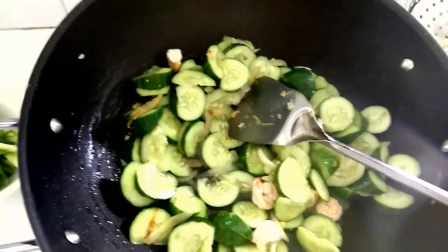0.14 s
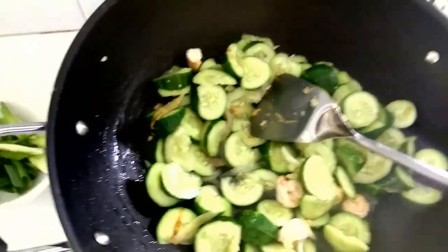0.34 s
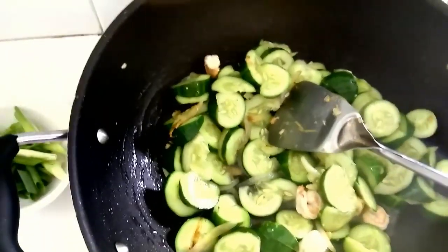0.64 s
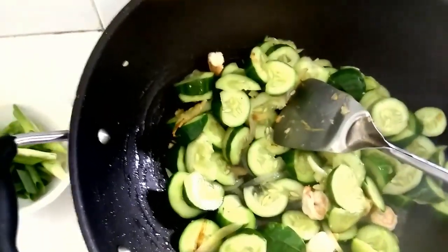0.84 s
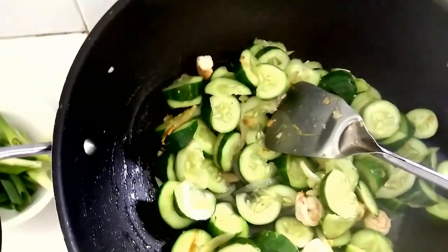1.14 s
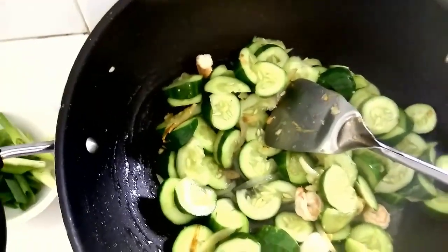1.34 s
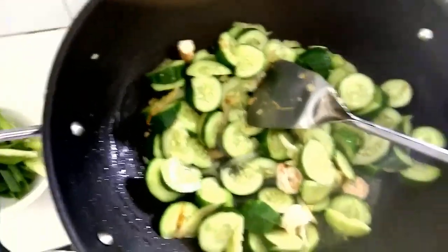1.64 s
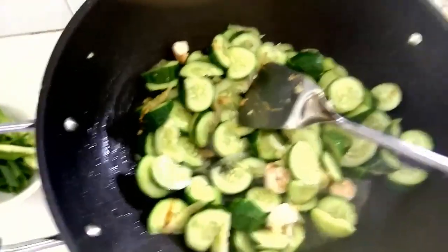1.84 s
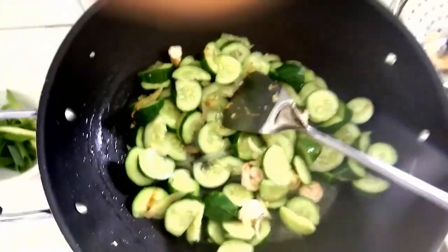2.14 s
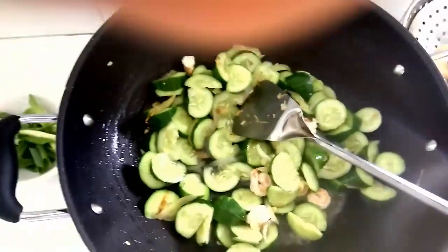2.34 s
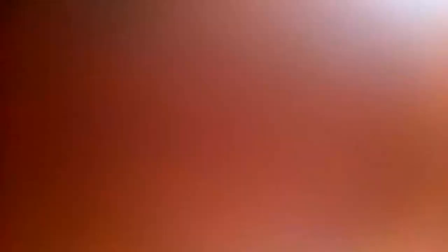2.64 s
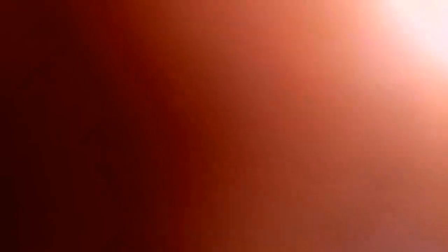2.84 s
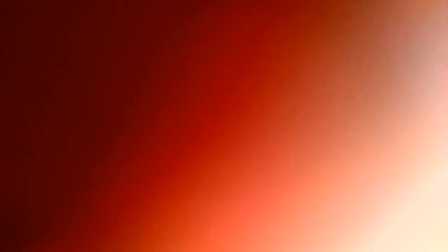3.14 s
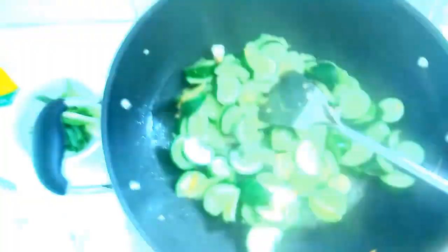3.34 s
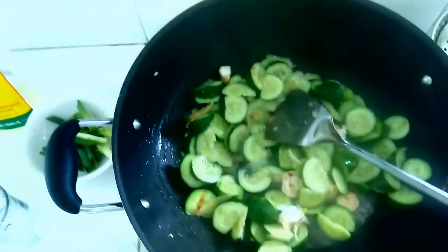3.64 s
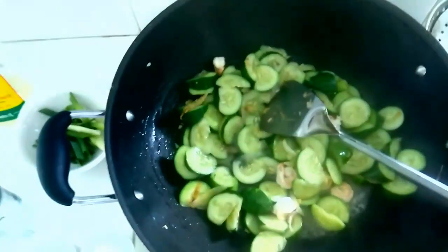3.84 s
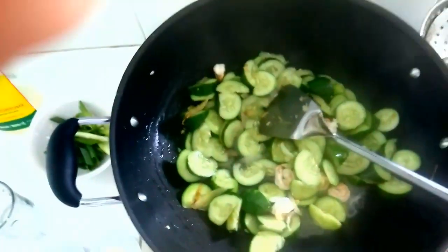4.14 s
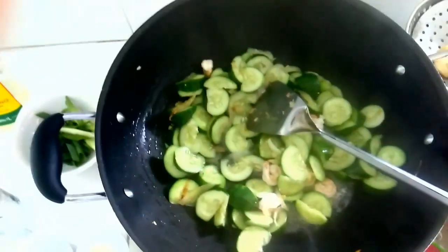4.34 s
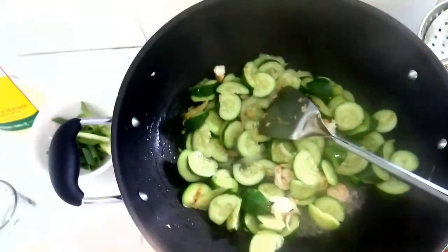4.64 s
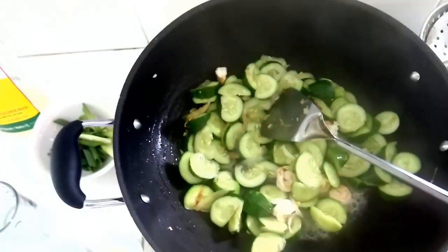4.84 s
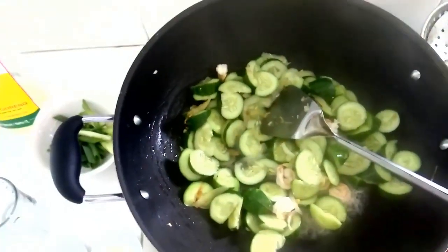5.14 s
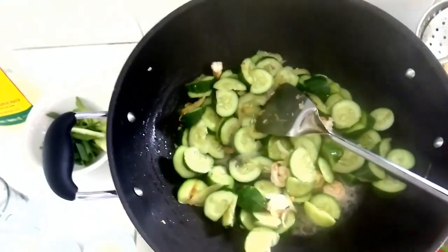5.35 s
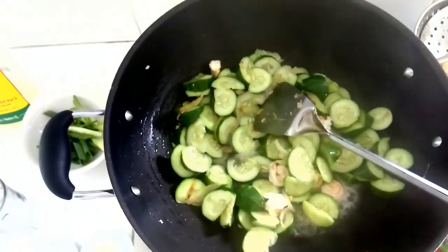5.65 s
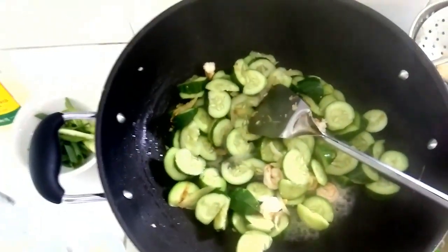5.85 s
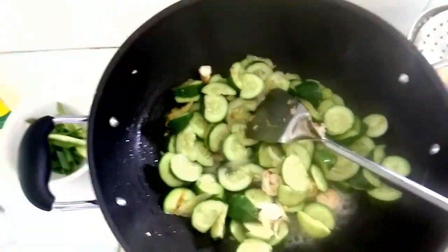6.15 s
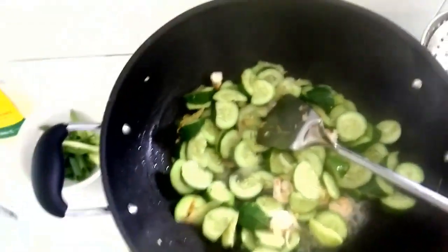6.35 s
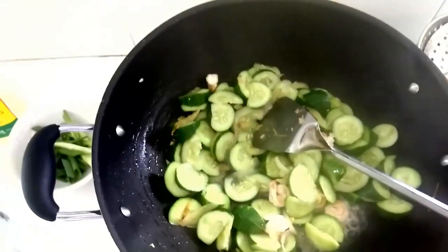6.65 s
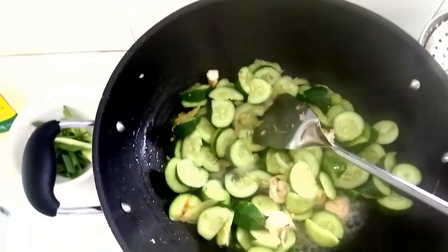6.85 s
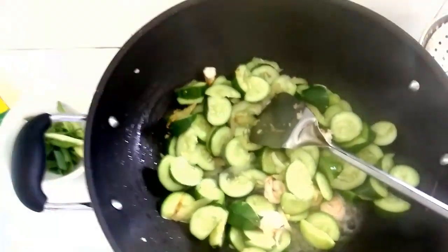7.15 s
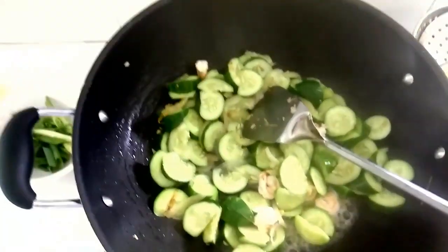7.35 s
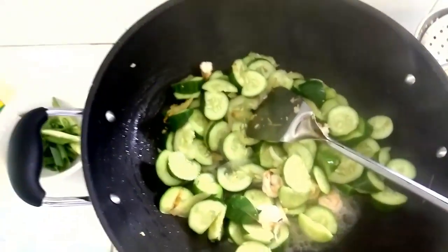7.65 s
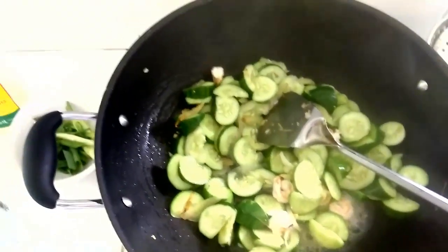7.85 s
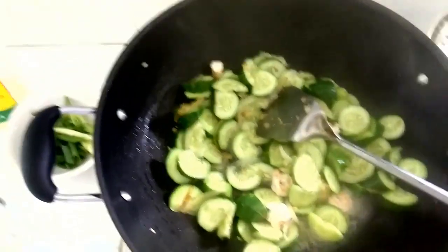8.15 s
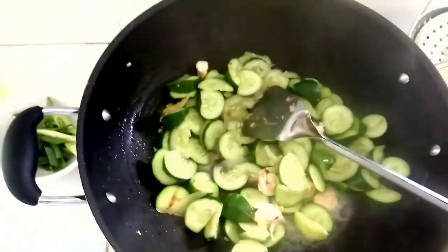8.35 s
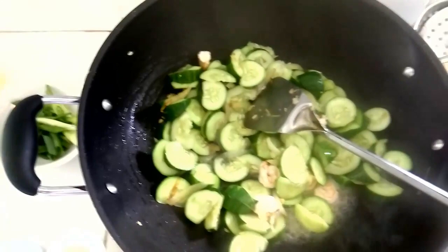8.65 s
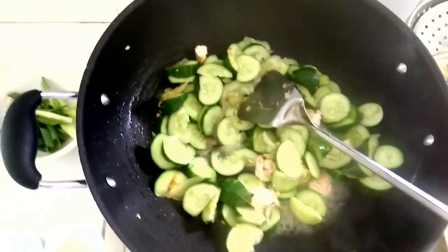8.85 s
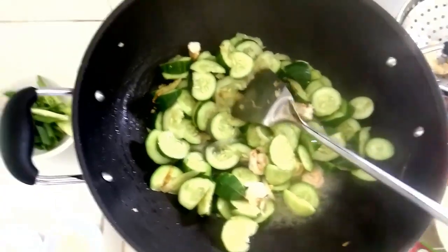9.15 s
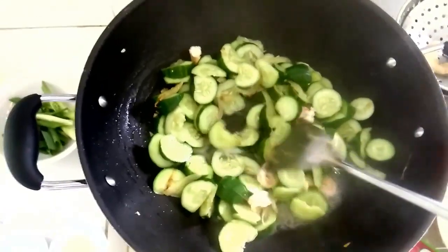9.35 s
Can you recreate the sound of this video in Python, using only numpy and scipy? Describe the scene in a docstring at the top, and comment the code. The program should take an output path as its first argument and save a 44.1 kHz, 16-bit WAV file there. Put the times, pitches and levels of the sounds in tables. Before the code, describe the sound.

A close, mono phone pickup of vegetables frying in a hot wok, in a tiled kitchen with only a slight, short echo. Throughout, a bright, dense fizz of tiny crackles and ringing bubbles sits over a faint low simmer. From 0 to 1.5 s sharp oil spits come thickly, some with short dull plops of bursting steam, strongest near 0.95 and 1.1; each loud snap ducks the sizzle, which swells back. At 1.27 a steel spatula scrapes with a thin wavering squeak, then a tiny scrape at 1.43. Around 2.2 a hand cups the microphone, making the hiss hollow. Wetter, coarser sputter swells towards 3-4 s, then gradually eases, with sparser spits and a few plops around 6, 7.1 and 8.2. At about 8.6 the hand lifts and the tone opens; a sputter surge at 8.9 falls quickly to thinner fizz until about 9.5.

```python
"""In a tiled kitchen, water boils off in a hot wok of vegetables, heard through a phone's single microphone.
Random micro-bursts and ringing bubbles make the fizz, sputter and low simmer; noise cracks make the spits.
Damped modes make a few plops; slips and a wavering tone make a steel spatula's brief scrapes.
A cupping hand hollows the hiss for about six seconds; the kitchen faintly answers the spits and plops.
Each loud spit makes the phone's limiter duck the sizzle, which then swells back."""
import sys
import numpy as np
from scipy import signal
from scipy.fft import rfft, irfft, next_fast_len
from scipy.io import wavfile
from scipy.ndimage import uniform_filter1d, minimum_filter1d, map_coordinates

SR = 44100
rng = np.random.default_rng(int(sys.argv[2]) if len(sys.argv) > 2 else 0)


def wrap_up_sound(samples):
    """Save the sound to the file named by the first command line argument, as 16-bit audio."""
    columns = np.atleast_2d(samples).T
    # keep every value between -1 and 1, then stretch to whole-number steps
    tamed = np.clip(columns, -1, 1)
    steps = np.round(tamed * 32767).astype(np.int16)
    wavfile.write(sys.argv[1], SR, steps)


N = 418509  # length in samples

# course of the boil before fixed offsets: t/s, sizzle level/dB, coarse sputter level/dB re sizzle
BOIL_COURSE = [(0, -21, -20), (0.25, -14, -8.5), (0.5, -17.5, -13.5), (1.2, -17.5, -25), (1.65, -16, -7),
               (2.3, -12, -10), (2.7, -17, -6), (3.1, -14, -4.5), (3.8, -14.5, -6), (5.5, -15.5, -10.5),
               (7.0, -15.5, -12.5), (8.33, -17.7, -18.5), (8.53, -17, -12), (8.72, -16.8, -15),
               (8.92, -14, -6.5), (9.12, -19.5, -28), (9.49, -16.5, -18)]
# filter shaping the fine fizz: f/Hz, relative gain/dB
FIZZ_SPECTRUM = [(500, -51), (900, -21.5), (1400, -14), (2000, -11.5), (2700, -8.5), (4000, -7.5),
                 (5500, -6), (7500, -3.5), (9200, 0), (10600, 1.5), (12300, 0), (14000, -2.5), (15800, -4)]
# filter shaping the coarse sputter: f/Hz, relative gain/dB
SPUTTER_SPECTRUM = [(400, -33), (800, -25), (1000, -3), (1200, -12.5), (1800, -9), (2500, 0), (4000, 7),
                    (6500, 5.5), (12000, 4.5)]
# filter shaping the low simmer: f/Hz, relative gain/dB
SIMMER_SPECTRUM = [(20, -7.5), (100, -6), (140, -3.5), (210, 1.5), (330, -2.5), (520, 1.5), (800, 1.5),
                   (1000, 10.5), (1200, -16), (2500, -22)]
# loudest droplets bursting in the oil, ahead of the limiter: t/s, peak level/dB
LOUD_SPITS = [(.042, 6), (.083, 9), (.112, 10), (.251, 9.5), (.365, 12), (.387, 9.5), (.423, 9.5),
              (.621, 7.5), (.671, 7), (.873, 7.5), (.946, 12), (.972, 9), (1.115, 12), (1.244, 8.5),
              (1.403, 9.5), (1.446, 10), (1.668, 10), (1.737, 7.5), (1.802, 7), (2.135, 9), (2.497, 13),
              (2.873, 9.5), (3.205, 10.5), (3.424, 11.5), (4.603, 9.5), (4.778, 8), (5.926, 8.5), (6.06, 7),
              (6.602, 6.5), (7.089, 8), (7.117, 10), (7.323, 5.5), (7.914, 6), (8.175, 6.5), (8.306, 8.5),
              (8.364, 8), (8.696, 6.5)]
# filter shaping a spit: f/Hz, relative gain/dB
SPIT_SPECTRUM = [(500, -28.5), (1200, -21), (3000, -12), (6500, -10.5), (11000, 5.5), (15800, 2.5),
                 (16500, -60)]
# reverberation of the tiled kitchen: f/Hz, t60/s
ROOM_DECAY = [(200, 0.054), (2000, 0.25), (15000, 0.046)]
# steam pockets bursting under the vegetables: t/s, peak level/dB, low ring level/dB added to its modes
STEAM_BURSTS = [(.083, -10.5, -4), (0.2, -11, -22), (.364, -13, 5), (0.422, -18, -6), (0.535, -23, -11),
                (.946, 4, 1), (1.115, -7, 13), (1.445, -19, 11), (6.06, -13, -5), (7.089, -2.5, 8),
                (7.207, -13.5, -5), (8.174, -5, 4)]
# modes of the burst's push: f/Hz, relative level/dB, t60/s
PUSH_MODES = [(620, -5.5, 0.0058), (1300, 5.5, 0.0027), (2380, 0.5, 0.0037), (4500, -8.5, .002)]
# modes of the pocket's low ring: f/Hz, relative level/dB, t60/s
POCKET_MODES = [(232, -18.5, 0.038), (387, -14.5, 0.011)]
# strokes of the spatula: t/s, length/s, rub level/dB, squeak level/dB
STROKES = [(1.268, .108, -34, -30.5), (1.432, 0.022, -26.5, -46)]
# resonances of the steel: f/Hz, bandwidth/Hz, relative level/dB
STEEL_MODES = [(200, 110, -9.5), (630, 120, -8), (1050, 110, 0), (2700, 85, 1)]
# hand closing in, resting, pressing tighter, lifting away: t/s, cavity notch f/Hz, closeness (factor on dB)
HAND_COURSE = [(2.16, 1900, 0.15), (2.29, 2720, 1.57), (2.5, 5600, 1), (3.4, 5900, 0.97),
               (3.75, 7530, 0.95), (5.5, 8150, 0.99), (8.35, 7440, 1.03), (8.57, 5330, 0.79),
               (8.68, 3200, 0.14)]
# colour of the hand's cavity at closeness 1: f as a multiple of the notch frequency, gain/dB
CAVITY_COLOUR = [(.06, -2), (.17, 2), (.36, 4), (.66, 0.5), (.85, -2.5), (1, -6.5), (1.18, -2), (1.42, 3),
                 (1.65, 3), (1.95, 1), (2.6, 1), (4, 0)]

SURGE_DB, SURGES_PER_S = 1, 12  # random swell and sink of the sizzle
SIMMER_DB, DRYING_DB_PER_S = -27.5, 0.12  # simmer re tabled sizzle level; its fading as the pool shrinks
# lesser spits: density, least peak, mean excess over it, greatest peak
SPITS_PER_S, SMALLEST_DB, SPREAD_DB, BIGGEST_DB = 44, -6.5, 2.5, 2.5
TOP_HZ = 15900  # the phone's band limit


def amp(db):
    """Amplitude ratio: 20 dB is a factor of ten."""
    return 10 ** (np.asarray(db) / 20)


def unit(x):
    """Normalisation to an rms value of 1."""
    return x / np.sqrt(np.mean(x ** 2) + 1e-20)


def along(points, hz):
    """Linear interpolation over logarithmic frequency."""
    f, v = np.transpose(points)
    return np.interp(np.log(hz + 1e-6), np.log(f), v)


def curves(rows, t):
    """Linear interpolation in time of each column after the first."""
    s, *cols = np.transpose(rows)
    return [np.interp(t, s, c) for c in cols]


def filtered(x, response):
    """Linear filtering: the spectrum is multiplied by a response of frequency."""
    size = next_fast_len(len(x) + 8192)
    hz = np.fft.rfftfreq(size, 1 / SR)
    return irfft(rfft(x, size) * response(hz), size)[:len(x)]


def coloured(x, spectrum):
    """Spectral shaping by a table of gains, normalised to rms 1."""
    return unit(filtered(x, lambda hz: amp(along(spectrum, hz))))


def add(track, s, sound):
    """Superposition: a sound is added to the track from time s."""
    part = track[round(s * SR):][:len(sound)]
    part += sound[:len(part)]


def wobble(rate):
    """Slow random modulation: a smooth curve through rate random knots a second."""
    return map_coordinates(rng.standard_normal(256), [np.arange(N) * rate / SR], mode="mirror")


def crackle(rate, spread_db, t60):
    """Shot noise: random decaying bursts of noise, most small and a few larger."""
    count = int(rate * N / SR)
    size_db = spread_db * np.minimum(rng.exponential(1, count), 4.5)
    impulses = np.bincount(rng.integers(0, N, count), amp(size_db) ** 2, N)
    decay_per_sample = amp(-60 / (t60 * SR)) ** 2  # squared, as it acts on energy
    energy = signal.lfilter([1], [1, -decay_per_sample], impulses)
    return unit(np.sqrt(energy) * rng.standard_normal(N))


def bubbles(rate, centre_hz, octaves, cycles, spread_db, size):
    """Bubble resonance: each rings at its own pitch, falling 60 dB in the given number of cycles."""
    count = int(rate * N / SR)
    when, pitch, strength = rng.random((count, 3)).T[:, :, None]
    hz = np.minimum(centre_hz * 2 ** (octaves * (pitch - .5)), TOP_HZ)
    turns = hz * np.arange(size) / SR
    level_db = spread_db * np.minimum(-np.log(1 - strength), 5)
    rings = amp(level_db - 60 * turns / cycles) * np.sin(2 * np.pi * turns)
    places = (when * N).astype(int) + np.arange(size)
    return unit(np.bincount(places.ravel(), rings.ravel(), N)[:N])


def sizzle():
    """Flash boiling: water on metal fizzes, wetter patches sputter, and pooled water simmers with them."""
    t = np.arange(N) / SR
    boil_db, sputter_db = curves(BOIL_COURSE, t)
    sizzle_db = boil_db + SURGE_DB * wobble(SURGES_PER_S)
    simmer_db = boil_db + SIMMER_DB - DRYING_DB_PER_S * t

    fine = crackle(rate=7000, spread_db=2.0, t60=0.0012)
    fine += amp(-11.0) * bubbles(rate=1100, centre_hz=8013, octaves=2, cycles=230, spread_db=2, size=1000)
    coarse = crackle(rate=1500, spread_db=0.5, t60=0.002)
    coarse += amp(-8) * bubbles(rate=300, centre_hz=2516, octaves=2.4, cycles=107, spread_db=2.0, size=1600)
    low = rng.standard_normal(N)
    low += amp(-15.0) * bubbles(rate=200, centre_hz=655, octaves=2.6, cycles=14.3, spread_db=1.5, size=1200)

    fizz = coloured(fine, FIZZ_SPECTRUM)
    sputter = amp(sputter_db + 2) * coloured(coarse, SPUTTER_SPECTRUM)
    simmer = amp(simmer_db) * coloured(low, SIMMER_SPECTRUM)
    return amp(sizzle_db + 2.0) * (fizz + sputter) + simmer


def spits(crack_t60=0.0022, tail_db=-32, tail_t60=0.14):
    """Impulsive radiation: a very short crack and the bowl's faint answer, with many small ones at random."""
    out, t = np.zeros(N), np.arange(1024) / SR
    when, size = rng.uniform(size=(int(SPITS_PER_S * N / SR), 2)).T
    small_db = np.minimum(SMALLEST_DB - SPREAD_DB * np.log(1 - size), BIGGEST_DB)  # the bigger the rarer
    small = np.column_stack([when * N / SR, small_db])
    starts, peaks_db = np.vstack([LOUD_SPITS, small]).T

    envelope = amp(-60 * t / crack_t60) + amp(tail_db - 60 * t / tail_t60)
    bursts = rng.standard_normal((len(starts), len(t))) * envelope
    colour = amp(along(SPIT_SPECTRUM, np.fft.rfftfreq(len(t), 1 / SR)))
    # the shift leaves room for the zero-phase filter to ring ahead of the crack
    bursts = irfft(rfft(np.roll(bursts, 16, axis=1)) * colour)
    for start, peak_db, burst in zip(starts, peaks_db, bursts):
        add(out, start, amp(peak_db) * burst / np.abs(burst).max())
    return out


def kitchen(x):
    """Diffuse reverberation: noise decaying at a rate set by frequency serves as the impulse response."""
    hz, t, z = signal.stft(rng.standard_normal(SR // 4), SR, nperseg=256)
    decay = amp(-60 * t / along(ROOM_DECAY, hz)[:, None])
    tail = signal.istft(z * decay, SR, nperseg=256)[1]
    return signal.fftconvolve(x, tail / np.linalg.norm(tail))[:N]


def ring(modes, t):
    """Modal superposition: a sum of exponentially damped sines."""
    return sum(amp(db - 60 * t / t60) * np.sin(2 * np.pi * hz * t) for hz, db, t60 in modes)


def plops():
    """Cavity radiation: a bursting steam pocket pushes once and rings low, too small to radiate deep bass."""
    out, t = np.zeros(N), np.arange(4096) / SR
    radiation = signal.butter(4, 185, "high", fs=SR, output="sos")
    push, pocket = ring(PUSH_MODES, t), ring(POCKET_MODES, t)
    for s, peak_db, ring_db in STEAM_BURSTS:
        burst = signal.sosfilt(radiation, push + amp(ring_db) * pocket)
        add(out, s, amp(peak_db) * burst / np.abs(burst).max())
    return out


def steel(f):
    """Modal response: resonators of alternating sign, each peaking at its own frequency."""
    response = 0
    for k, (centre, width, db) in enumerate(STEEL_MODES):
        resonance = 1j * f * width / (centre * centre - f * f + 1j * f * width)
        response = response + (-1) ** k * amp(db) * resonance
    return response


def spatula(squeak_hz=3065, waver_hz=70, rough_db=1.0):
    """Stick-slip friction: tiny slips excite the steel, and one mode locks into a rough, wavering squeak."""
    rubbing = unit(filtered(crackle(rate=1500, spread_db=5.0, t60=0.0014), steel))
    speed, grip = unit(uniform_filter1d(rng.standard_normal((2, N)), size=200))
    phase = 2 * np.pi * np.cumsum(squeak_hz + waver_hz * speed) / SR
    squeak = unit(amp(rough_db * grip) * np.sin(phase))
    out = np.zeros(N)
    for s, length, rub_db, squeak_db in STROKES:
        stroke = signal.windows.tukey(int(length * SR), .1)
        scrape = amp(rub_db) * rubbing + amp(squeak_db) * squeak
        add(out, s, stroke * scrape[round(s * SR):][:len(stroke)])
    return out


def cupped(x):
    """Cavity filtering: the hand lifts some bands and cancels one; the smaller the gap, the higher the notch."""
    hz, t, z = signal.stft(x, SR, nperseg=512)
    notch_hz, closeness = curves(HAND_COURSE, t)
    gain_db = closeness * along(CAVITY_COLOUR, hz[:, None] / notch_hz)
    return signal.istft(z * amp(gain_db), SR, nperseg=512)[1][:N]


def scene():
    """Superposition at one microphone: the same signal feeds both channels."""
    bursts = plops() + spits()
    hollowed = cupped(sizzle() + spatula())
    wok = hollowed + bursts + amp(-14.0) * kitchen(bursts)
    return np.array([wok, wok])


def limited(x, ceiling_db=0, release_db_per_s=140):
    """Peak limiting: the gain falls at once on a peak and climbs back at a steady rate in decibels."""
    over_db = np.maximum(20 * np.log10(np.abs(x) + 1e-9) - ceiling_db, 0)
    climb = release_db_per_s * np.arange(N) / SR
    gain_db = climb - np.maximum.accumulate(over_db + climb)
    # hold each dip over 41 samples, then round its edges
    held_db = minimum_filter1d(gain_db, size=41)
    return x * amp(uniform_filter1d(held_db, size=41))


def record(dry):
    """Band limitation: the phone limits the peaks, then keeps nothing from its band limit upward."""
    return np.array([filtered(limited(channel), lambda hz: hz < TOP_HZ) for channel in dry])


dry = scene()
out = record(dry)
wrap_up_sound(out)
```